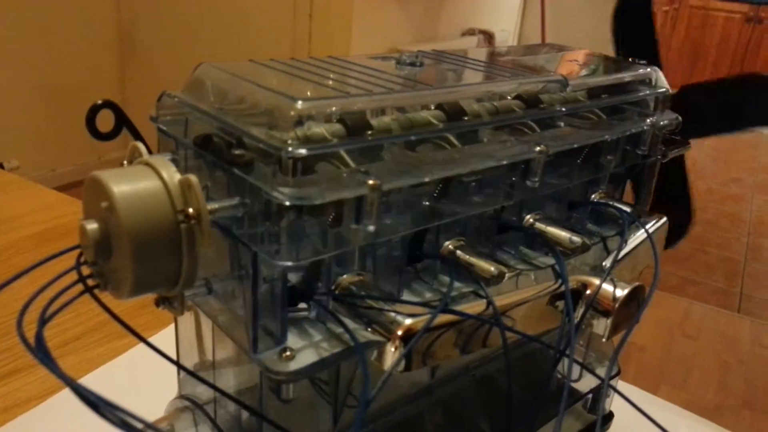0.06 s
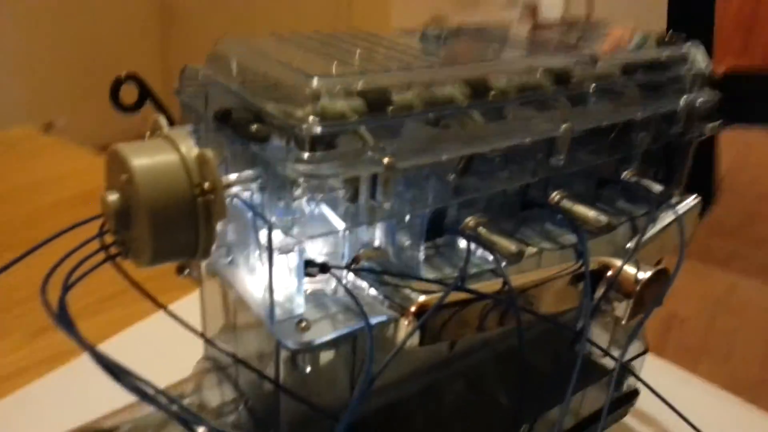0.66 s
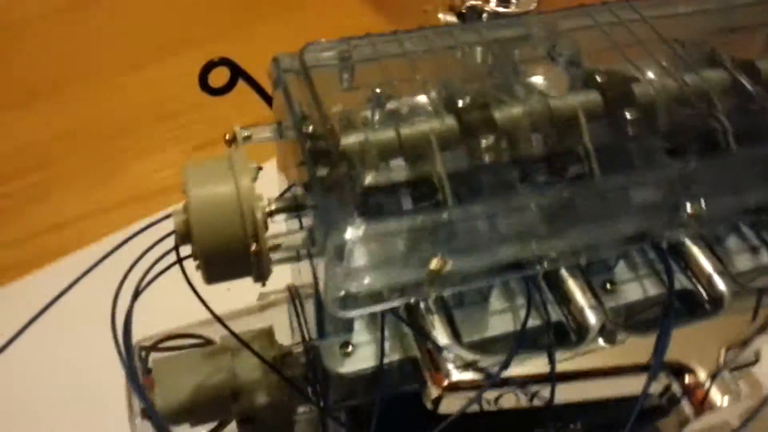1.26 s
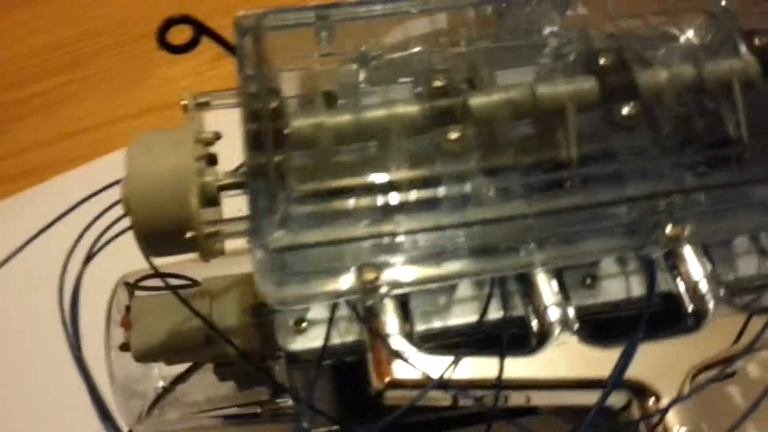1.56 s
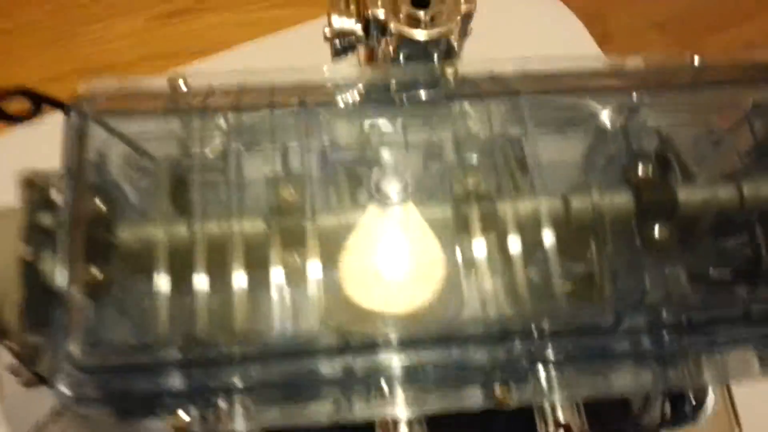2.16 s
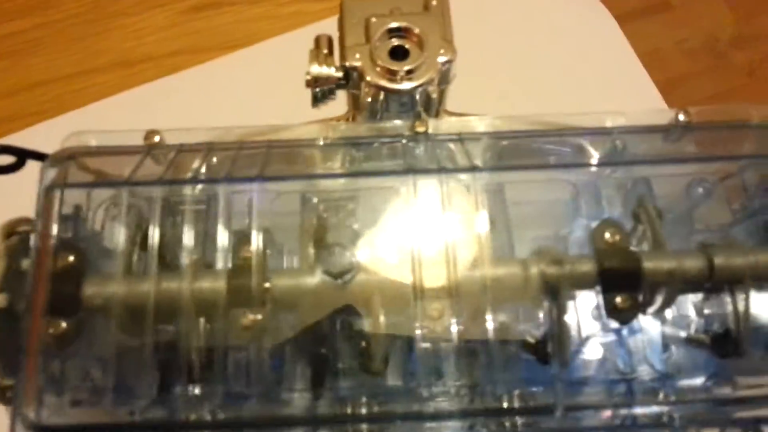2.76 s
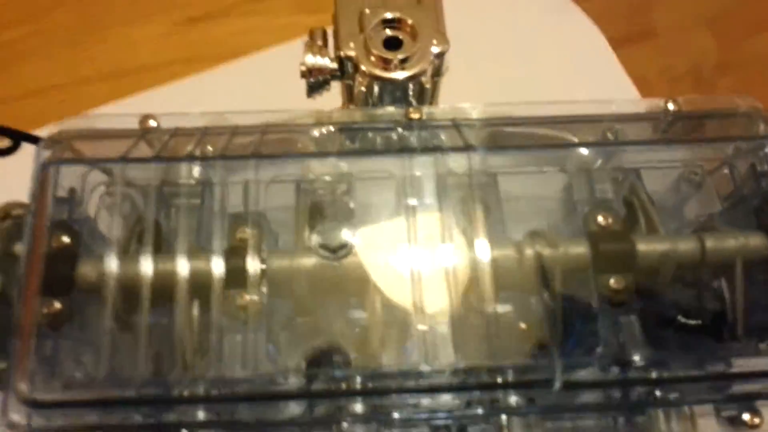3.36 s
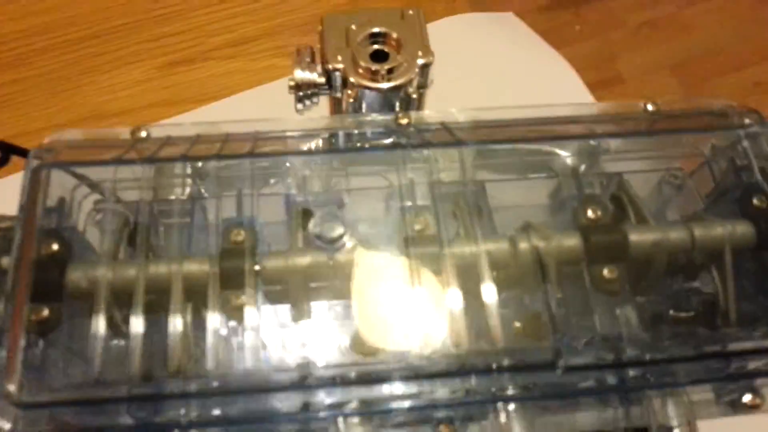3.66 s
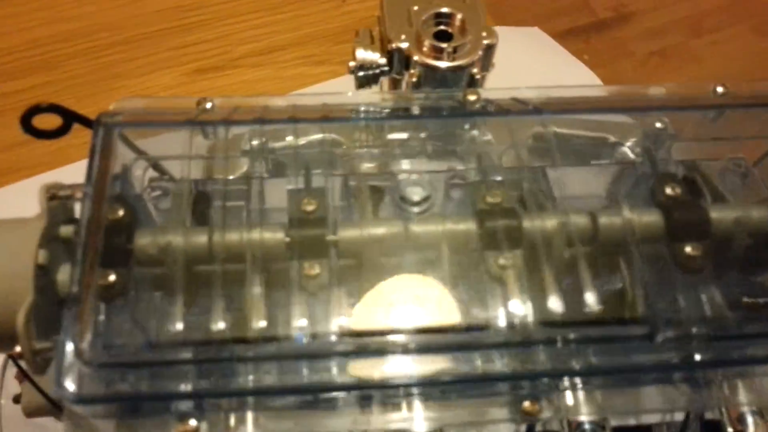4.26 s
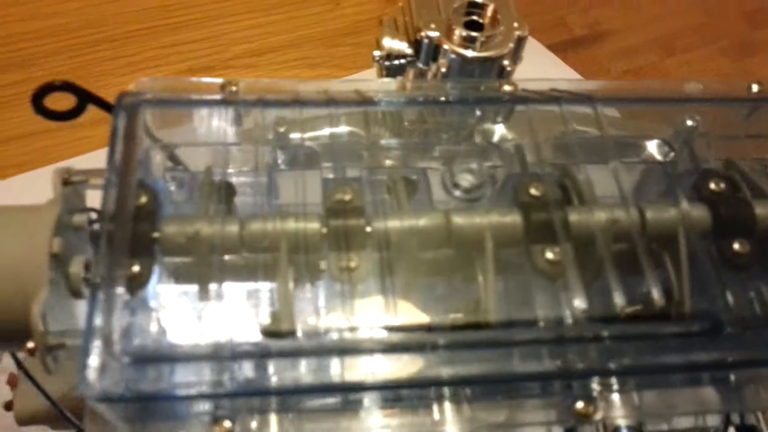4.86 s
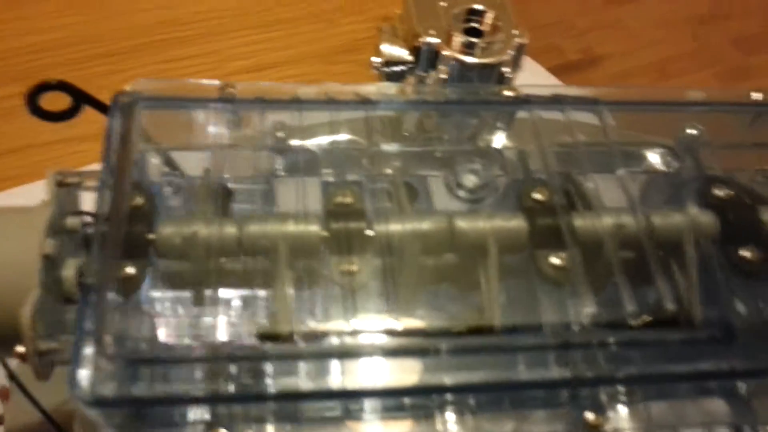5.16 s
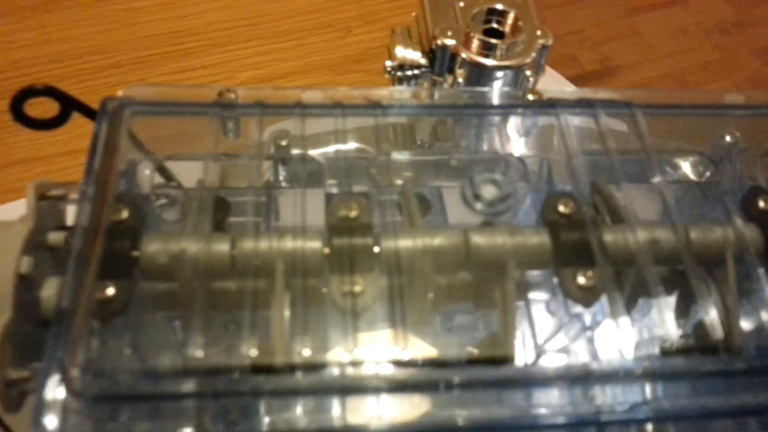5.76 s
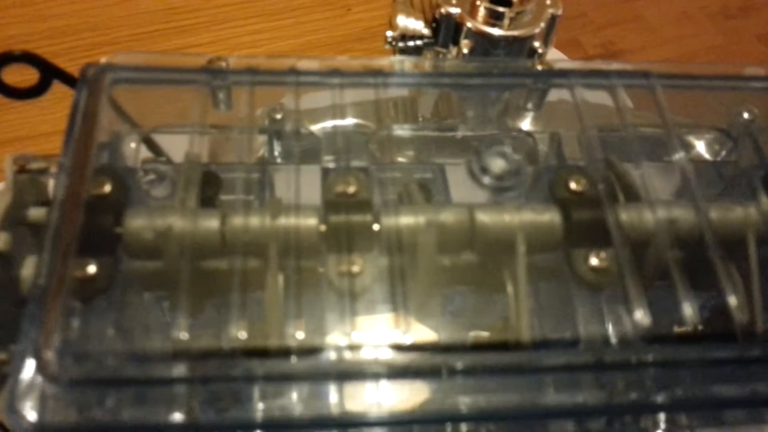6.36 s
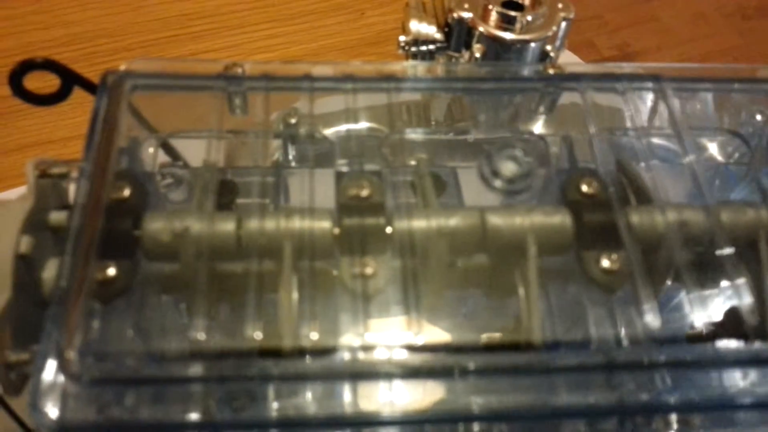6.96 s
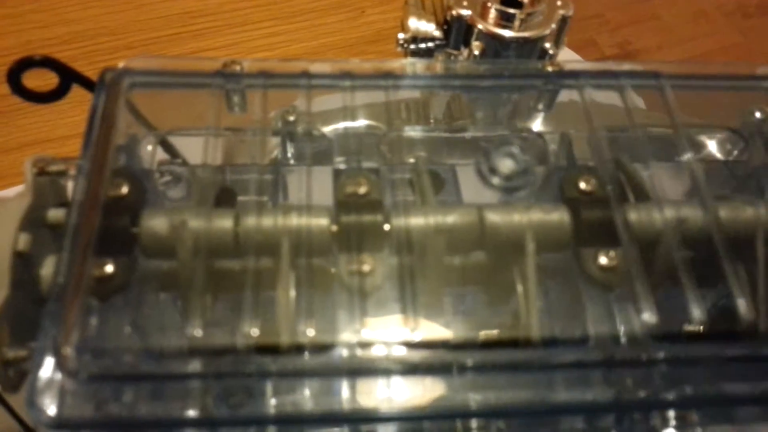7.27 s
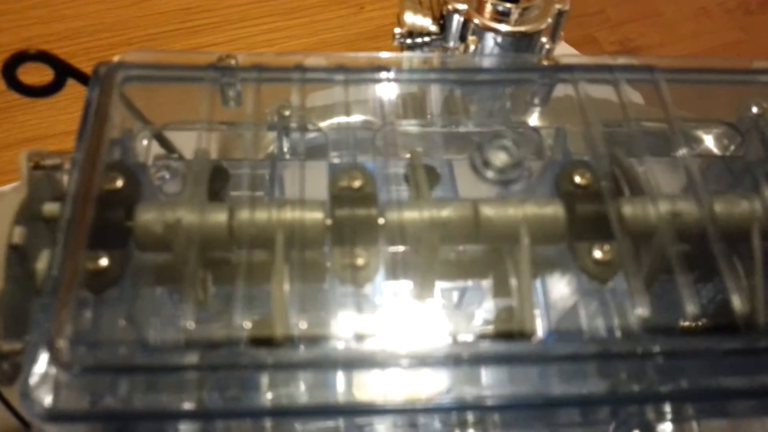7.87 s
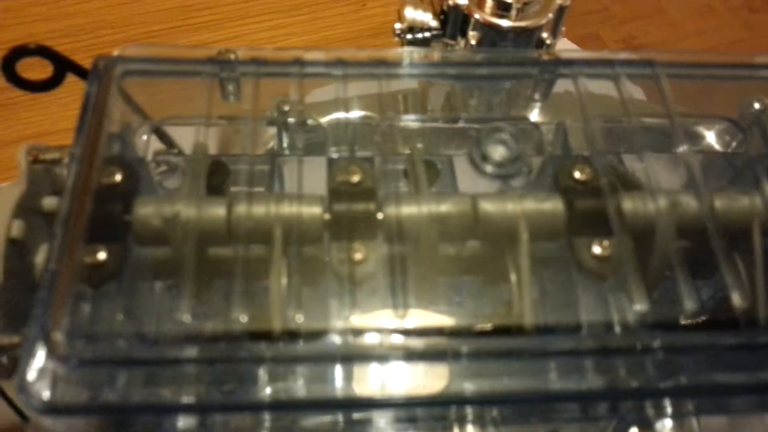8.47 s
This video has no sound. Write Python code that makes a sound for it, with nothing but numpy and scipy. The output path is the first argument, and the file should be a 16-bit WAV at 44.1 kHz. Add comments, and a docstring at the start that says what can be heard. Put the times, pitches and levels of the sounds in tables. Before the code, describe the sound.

A small motor hums as a model engine's plastic gears whine and rattle steadily, with sharp clacks and light clicks.

```python
"""Plastic gears whine, knock and rattle in the hollow case of a model engine running on a table.
A small humming motor drives them; its speed sags and recovers with the load of crank and cams.
About every two seconds a valve part snaps off its cam with a hard clack while the gears ease off.
Lighter clacks, bright ticks of snagging teeth and one soft creak come in between.
The microphone, a hand's width away, moves from the side of the case to above its cover."""
import sys
import numpy as np
from scipy import signal
from scipy.fft import rfft, irfft
from scipy.io import wavfile
from scipy.ndimage import uniform_filter1d, minimum_filter1d

SR = 44100
rng = np.random.default_rng(int(sys.argv[2]) if len(sys.argv) > 2 else 0)


def generate_wav(sig):
    """Save sig (samples, or channels by samples) to the path in sys.argv[1] as 16-bit PCM at SR."""
    pcm = np.round(np.clip(np.atleast_2d(sig).T, -1, 1) * 32767).astype(np.int16)
    wavfile.write(sys.argv[1], SR, pcm)


N = 384111
T = np.arange(N) / SR
PINION, FIRST_WHEEL, SECOND_WHEEL = 10, 30, 36  # teeth; a pinion is the small gear that drives a wheel


def tooth_knocks(turns, flaw=.11, play=.08, twist=.06, runout=.085, scatter_db=1.6, wobble_db=3.2):
    """The second wheel's teeth knock across a small gap; each has its own flaw, and their pinion wobbles."""
    teeth_passed = turns * PINION / FIRST_WHEEL * PINION
    tooth = np.arange(1, int(teeth_passed[-1]) - 1)
    wheel = tooth / SECOND_WHEEL - .03
    flaws = unit(rng.standard_normal(SECOND_WHEEL))[tooth % SECOND_WHEEL]
    time_jitter, level_jitter = rng.standard_normal((len(tooth), 2)).T
    # the teeth crowd together where the wheel runs tight
    early = runout * (np.sin(4 * np.pi * (wheel - .215)) + np.sin(2 * np.pi * (wheel - .69)))
    contact = tooth - early + flaw * flaws + play * time_jitter
    # the plastic shafts twist and spring back, so the tooth rate wavers
    samples = np.interp(contact, teeth_passed + twist * wander(25), np.arange(N)).astype(int)
    force = undb(scatter_db * level_jitter + wobble_db * np.cos(2 * np.pi * tooth / PINION))
    return np.bincount(samples, force * tight_spots(wheel, sharp_db=3.0, broad_db=3.5), N)


def tight_spots(wheel, sharp_db, broad_db):
    """The second wheel does not run true: one sharp catch and one broad rub change the level each turn."""
    return undb(sharp_db * bump(wheel, at=.215, width=.03) + broad_db * bump(wheel, at=.64, width=.095))


# how strongly the hollow case rings at each pitch: f/Hz, level/dB
CASE_TONE = [(100, -102), (170, -23.5), (300, -17), (420, -16.5), (560, -8), (640, -4.5), (720, -1),
             (830, 1), (960, 0.5), (1130, -16.5), (1230, -16.5), (1335, -8.5), (1400, -19.5), (1480, -10.5),
             (1620, -19), (2000, -16), (3000, -57)]

def case_boom(knocks, lag_s=.00009):
    """The knocks ring the case; the boom reaches the left a moment late, and the room scatters a little."""
    boom = unit(colour(knocks - knocks.mean(), CASE_TONE))[0]
    scattered = unit(colour(rng.standard_normal(N), CASE_TONE))
    direct = np.array([undb(-1.37) * np.interp(T - lag_s, T, boom), undb(0.48) * boom])
    return direct + undb(-49) * scattered * np.array([[1], [-1]])


# how hard the gears work: t/s, knock level/dB, rattle level/dB
GEAR_EFFORT = [(0.0, -16.5, -15), (0.2, -24, -18.0), (0.4, -19.5, -17.5), (1.05, -22.5, -18),
               (1.2, -17.5, -19.5), (1.3, -24.5, -22.5), (1.47, -18, -18), (1.6, -20, -18.5),
               (2.12, -16.5, -20), (2.17, -20.5, -21.5), (2.37, -25, -25), (2.42, -19, -22),
               (2.69, -19, -21), (2.94, -21, -18.5), (3.07, -19.5, -22.5), (3.14, -19, -19),
               (3.79, -19.5, -20.5), (3.87, -19, -23), (4.29, -24.5, -24.5), (4.39, -19.5, -21.5),
               (4.64, -20, -21.5), (4.71, -17, -18.5), (4.79, -20.5, -23), (4.91, -19.5, -20.5),
               (5.09, -19.5, -22), (5.41, -17.5, -20), (5.81, -21, -21.5), (5.89, -18.5, -20.5),
               (6.06, -20, -22.5), (6.16, -18.5, -20), (6.51, -17.5, -20), (6.61, -20, -22),
               (6.66, -15, -20), (6.76, -19, -22.5), (6.91, -16.5, -19.5), (7.06, -20.5, -23),
               (7.11, -16.5, -21.5), (7.41, -19, -21.5), (7.51, -18.5, -19.5), (7.61, -22.5, -20.5),
               (7.68, -13.5, -17.5), (7.86, -20.5, -20.5), (7.96, -20.5, -22.5), (8.06, -14, -18.5),
               (8.18, -21.5, -21.5), (8.71, -18, -21.5)]
# when the camshaft passes its catch, once a turn: t/s
CATCH_TIMES = [-.1, 1.891, 3.812, 5.892, 7.788, 9.8]

def gear_load(surge, lull_db=-2.2, knock_surge_db=1.1, rattle_surge_db=.8):
    """Knock and rattle levels in dB follow the slow load, a lull once a cam turn, and quick surges."""
    knock_db, rattle_db = curves(GEAR_EFFORT)
    cam_turns = np.interp(T, CATCH_TIMES, np.arange(len(CATCH_TIMES)))
    lull = lull_db * bump(cam_turns, at=0.005, width=.1)
    return knock_db + lull + knock_surge_db * surge, rattle_db + lull + rattle_surge_db * surge


# how loud the motor's pinion whines: t/s, level/dB
WHINE_LEVEL = [(0, -36), (.3, -28), (.5, -35), (.72, -28), (.87, -31), (1.0, -29), (1.3, -32), (1.47, -28),
               (1.65, -25.5), (1.82, -33), (2.02, -24.5), (2.27, -36), (2.6, -29), (2.87, -36), (3.17, -25),
               (3.35, -32.5), (3.5, -27.5), (3.9, -30), (4.2, -40), (4.4, -29), (4.7, -36), (5.13, -43),
               (5.3, -39), (5.7, -30), (6.0, -33), (6.2, -30.5), (6.4, -32), (6.7, -39), (7.3, -40),
               (7.72, -26.5), (7.85, -30), (8.05, -25.5), (8.3, -34.5), (8.7, -32)]

def gear_whine(turns, wheel, octave_db, wobble=0.15, rough=0.25, rub_db=11, catch_db=6.5):
    """The motor's pinion meshes ten times a turn and rings the case; it chirps at each tight spot."""
    sway = wobble * np.sin(2 * np.pi * turns * PINION / FIRST_WHEEL)
    phase = 2 * np.pi * PINION * turns + sway + rough * wander(120)
    tone = np.array([undb(2.6 * wander(22)) * np.sin(phase + .5 * wander(12)) for _ in range(2)])
    octave = np.array([undb(3.0 * wander(30)) * np.sin(2 * phase + 1.5 * wander(160)) for _ in range(2)])
    chirps = undb(rub_db * bump(wheel, at=.69, width=.15) + catch_db * bump(wheel, at=.23, width=.05))
    return undb(curves(WHINE_LEVEL)[0]) * unit(tone * chirps) + undb(octave_db) * unit(octave)


# tone of the rattle and the hiss: f/Hz, left level/dB, right level/dB
SIDE_TONE = [(228, -40, -33), (680, 4, 5), (1060, -11, -6), (1440, 5, 2), (1630, 3.5, 5.5),
             (1890, 8.5, -15), (2500, 5.5, -4), (2980, 5, -24), (3060, 10.5, 1), (3500, 0.5, -1),
             (3930, 1, -5), (4200, 0.5, -10), (4750, 6, -11), (4860, -33, -7), (6400, -18, -26),
             (9600, -24, -30), (10000, -14, -25), (11300, -19, -17), (13000, -21, -48), (14500, -43, -47)]  # thin walls, from the side
COVER_TONE = [(189, -56, -26.5), (777, 9, 2.5), (1020, 0, -1.5), (1450, 2, 1), (1540, 2.5, 3.5),
              (2080, 6, 4), (2670, -0.5, -7), (3030, -1, 0.5), (3480, -5.5, -2.5), (4140, -0.5, 2),
              (5200, -14.5, -1), (5600, -48, -26), (5760, -38, -11), (6300, -27, -25), (11400, -42, -47)]  # valve cover, from above
HISS_TONE = [(2980, 7.5, -27), (5800, -1, 4), (6640, -5, -1), (6820, 14, 15.5), (8450, 7, 15),
             (9400, 14.5, 11.5), (10300, -25, 13.5), (11300, -36, -91), (14500, -105, -99)]  # sliding teeth and motor brushes

def rattle(wheel, knocks, hiss_db, grain_db=2.5, stir_s=0.0028):
    """Loose parts, stirred by the teeth, chatter through the walls while sliding parts hiss."""
    stir = unit(signal.lfilter([1], [1, -np.exp(-1 / (stir_s * SR))], knocks))
    grain = (1 + .3 * stir) * undb(grain_db * wander(1800))
    chatter = grain * tight_spots(wheel, sharp_db=2.5, broad_db=-2.0)
    from_side = unit(colour(chatter * stereo_noise(shared=0.55, left_delay=-3), SIDE_TONE))
    from_above = unit(colour(chatter * stereo_noise(shared=0.59), COVER_TONE))
    # the microphone's right side comes over the cover first, its left a little later
    above = np.array([np.interp(T, [1.2, 2.4], [0, 1]), np.interp(T, [.9, 1.5], [0, 1])])
    walls = (1 - above) * from_side + above * from_above
    taps = stereo_noise(shared=0.31) * grain * tight_spots(wheel, sharp_db=3.5, broad_db=1.0)
    sliding = stereo_noise(shared=0.13) * undb(1.5 * wander(1500))
    sliding *= tight_spots(wheel + .012, sharp_db=-10.0, broad_db=-2.0)
    hiss = undb(hiss_db - 6.0) * unit(colour(sliding, HISS_TONE))
    return undb(-0.66) * walls + undb(-3.0) * wall_ring(taps) + hiss


# the notes that four parts of the case ring at: f/Hz, width/Hz, level/dB
SIDE_NOTES = [(1100, 60, -20), (1450, 60, -16), (1960, 80, -16), (2370, 60, -19), (3010, 80, -13),
              (3170, 100, -9), (3830, 60, -15), (4130, 80, -19), (4560, 160, -9)]
SHOULDER_NOTES = [(1335, 50, -14), (2350, 70, -17), (2700, 60, -17), (3020, 70, -11), (3230, 60, -10),
                  (3380, 60, -14), (4550, 70, -16), (4950, 130, -9), (5350, 220, -11), (6210, 100, -19)]
COVER_MIDDLE_NOTES = [(1040, 45, -15), (1335, 45, -17), (1900, 80, -13), (2220, 80, -11), (2480, 50, -17),
                      (2750, 60, -15), (2980, 70, -13), (3140, 80, -9), (3300, 60, -13), (4480, 110, -15)]
COVER_END_NOTES = [(1040, 45, -15), (1490, 60, -13), (1950, 80, -14), (2230, 70, -13), (2380, 60, -16),
                   (2680, 60, -17), (3170, 90, -15), (3550, 100, -17), (4260, 80, -16), (4400, 70, -17),
                   (5050, 180, -13), (5280, 110, -17), (6200, 110, -25), (7200, 110, -25)]
# where the microphone is: t/s, place (0 side, 1 shoulder, 2 middle of the cover, 3 its end)
MIC_PATH = [(0, 0), (.75, 0), (1.3, 1), (1.75, 1), (2.3, 2), (3.6, 2), (4.5, 3), (8.7, 3)]

def wall_ring(taps, band_hz=(900, 7500)):
    """Each part of the case rings with its own notes, heard as the microphone passes over it."""
    taps = signal.sosfilt(signal.butter(4, band_hz, "band", fs=SR, output="sos"), taps)
    place, ring = curves(MIC_PATH)[0], 0
    for k, notes in enumerate([SIDE_NOTES, SHOULDER_NOTES, COVER_MIDDLE_NOTES, COVER_END_NOTES]):
        nearness = np.sqrt(np.maximum(1 - np.abs(place - k), 0))
        for hz, width, db in notes:
            note = unit(signal.lfilter(*signal.iirpeak(hz, hz / width, SR), taps))
            ring = ring + nearness * undb(db) * note
    return ring


# each clack: t/s, snap level/dB, thud level/dB, thud f/Hz, ping level/dB, ping f/Hz
CLACK_HITS = [(0.404, -16, -19, 925, -17, 3230), (0.645, -10.5, -20, 940, -19, 3150),
              (0.982, -11.5, -33, 1030, -12, 3890), (1.891, -6, -6, 937, -16, 3170),
              (2.401, -23, -18, 775, -30, 3200), (2.425, -31, -20, 930, -17, 2600),
              (2.667, -29, -12, 724, -35, 3200), (2.759, -16, -11.5, 1010, -30, 3200),
              (3.491, -22, -12, 850, -16, 3223), (3.813, -11, -5, 946, -24, 4200),
              (4.406, -24, -11.5, 815, -17, 3150), (4.551, -21, -16, 840, -17, 2290),
              (4.694, -20, -16, 794, -27, 1900), (4.719, -11.5, -10, 990, -11, 1900),
              (4.84, -19, -13, 797, -28, 2200), (4.889, -25, -11, 810, -28, 4050),
              (5.014, -13.5, -23, 971, -10, 3400), (5.559, -21, -11, 850, -30, 3243),
              (5.892, -8, -9.5, 904, -8, 5250), (5.946, -39, -30, 845, -35, 5256),
              (6.196, -20, -20, 804, -24, 5280), (6.416, -28, -13, 720, -30, 3215),
              (6.66, -21, -16, 830, -22, 3200), (6.73, -14, -8.5, 860, -16.5, 3350),
              (6.91, -26, -22, 820, -30, 5270), (7.435, -25, -15, 850, -30, 3194),
              (7.7882, -9, -3, 944, -14, 4000), (8.02, -25, -15, 830, -19, 2250)]
# tone of the snapping part: f/Hz, level/dB
SNAP_TONE = [(60, -19), (300, -18), (600, 0), (1000, -4), (1650, 1), (2100, 0), (2600, -10), (3000, -3),
             (3250, 6), (3650, -12), (4050, 3), (4350, -5), (4680, 0), (4980, -8), (5280, -1), (5700, -10),
             (6300, -9), (9500, -14), (14500, -33)]
# the notes in the cover's thud: multiple of the thud's pitch, level/dB, fade time/s
THUD_NOTES = [(1, 0, .03), (1.27, 0, .008), (1.6, -5, .004)]

def clacks(snap_s=0.0024, thud_s=.0019, ping_s=.0014, stiffen=0.3, tail_s=0.046, tail_db=-26):
    """A part slips off its cam: it skids with a snap, thuds on the cover and pings the spot it hits."""
    force, ring = np.zeros(N), np.zeros(N)
    age = np.arange(SR // 8) / SR
    # the cover is stiffer while the part presses on it, so the thud starts high and falls
    bent_age = age + stiffen * thud_s * (1 - np.exp(-age / thud_s))
    for start, snap_db, thud_db, thud_hz, ping_db, ping_hz in CLACK_HITS:
        span = slice(int(start * SR), int(start * SR) + len(age))
        force[span] += undb(snap_db) * (blow(age, snap_s) + undb(tail_db) * np.exp(-age / tail_s))
        thud = sum(undb(db) * np.exp(-age / fade_s) * np.sin(2 * np.pi * k * thud_hz * bent_age)
                   for k, db, fade_s in THUD_NOTES)
        ping = np.sin(2 * np.pi * ping_hz * age)
        ring[span] += undb(thud_db) * blow(age, thud_s) * thud + undb(ping_db) * blow(age, ping_s) * ping
    snaps = colour(force * stereo_noise(shared=0.065), SNAP_TONE)
    return soften(snaps) + ring


def soften(snaps, hard_db=-12, soft_db=-22, soft_hz=7000):
    """A lighter contact is duller: weak snaps lose their treble."""
    hardness = np.clip((curves(CLACK_HITS)[0] - soft_db) / (hard_db - soft_db), 0, 1)
    dull = signal.sosfiltfilt(signal.butter(2, soft_hz, fs=SR, output="sos"), snaps)
    return dull + hardness * (snaps - dull)


# when the second wheel snags hard: t/s, level/dB
SNAG_HITS = [(0.83, -21), (4.987, -12), (5.187, -10), (5.239, -9), (5.285, -8), (5.436, -12), (6.346, -19),
             (6.492, -14), (6.543, -22), (6.640, -12), (6.689, -14), (6.787, -11), (6.835, -15),
             (6.935, -12.5), (6.985, -12), (7.085, -11), (7.136, -16), (7.284, -15)]
# tone of the snagging tooth: f/Hz, level/dB
SNAG_TONE = [(400, -11), (1500, 0), (2400, -3), (3500, 0), (4400, 13), (5200, 7), (6000, -17), (7000, -20),
             (11000, -12), (14000, -54)]

def snags(rise_s=0.00073):
    """A tooth snags and lets go with a short, bright tick."""
    force, age = np.zeros(N), np.arange(SR // 50) / SR
    for start, db in SNAG_HITS:
        force[int(start * SR):int(start * SR) + len(age)] += undb(db) * blow(age, rise_s)
    return undb(-4.0) * colour(force * stereo_noise(shared=0.19), SNAG_TONE)


# how loud the motor hums: t/s, level/dB
HUM_LEVEL = [(0.0, -42.5), (0.56, -35.5), (1.11, -48.5), (2.11, -44), (2.25, -50), (2.57, -43), (3.08, -51),
             (3.42, -44.5), (4.34, -48), (4.56, -39.5), (5.17, -45), (5.75, -42), (6.04, -49), (6.18, -43),
             (6.89, -41), (7.03, -46), (7.62, -45), (7.69, -40), (7.93, -46), (8.05, -40), (8.3, -46),
             (8.71, -43)]
# the notes that the case's panels ring at: f/Hz, width/Hz, level/dB
PANEL_NOTES = [(450, 170, -32.5), (683.6, 130, -8), (751, 87, 0), (1466, 140, -18.5)]

def motor_hum(shaft_hz, turns, overtone_db):
    """The unbalanced motor hums at shaft speed; each overtone swells as it glides past a panel's note."""
    overtones = 0
    for k in range(2, 8):
        swell = np.max([undb(db) / (1 + (2 * (k * shaft_hz - hz) / width) ** 2)
                        for hz, width, db in PANEL_NOTES], axis=0)
        overtones += swell * undb(1.5 * wander(25)) * np.sin(2 * np.pi * k * turns + 0.37 * wander(30))
    hum = undb(curves(HUM_LEVEL)[0] + 1.3 * wander(23)) * np.sin(2 * np.pi * turns)
    lean_left = undb([[.7], [-.7]])
    return np.sqrt(2) * (hum * lean_left + undb(overtone_db) * overtones)


# the wall's creak: t/s, f/Hz, level/dB
CREAK_GLIDE = [(1.19, 331, -72), (1.215, 307.3, -35), (1.245, 257, -34), (1.265, 265, -53),
               (1.28, 280, -31), (1.31, 290, -78)]

def creak():
    """The wall creaks once with a soft, low, gliding tone."""
    hz, db = curves(CREAK_GLIDE)
    sounding = (db > db[0]) & (T < CREAK_GLIDE[-1][0])
    return undb(db) * sounding * np.sin(2 * np.pi * np.cumsum(hz) / SR)


def undb(db):
    """Turn decibels into a gain."""
    return 10 ** (np.asarray(db) / 20)


def unit(x):
    """Scale a signal to an average power of 1."""
    return x / np.sqrt(np.mean(x ** 2))


def curves(table):
    """Join each column of a table with straight lines over time."""
    times, *columns = np.transpose(table)
    return [np.interp(T, times, c) for c in columns]


def colour(x, table, size=2048):
    """Filter a sound with a tone table; a second level column gives a second channel."""
    hz, *columns = np.transpose(table)
    log_hz = np.log(np.maximum(np.fft.rfftfreq(size, 1 / SR), 1))
    cepstrum = irfft([np.log(undb(np.interp(log_hz, np.log(hz), c))) for c in columns])
    # fold it so that the ringing comes after a hit, never before
    cepstrum[:, 1:size // 2] *= 2
    cepstrum[:, size // 2 + 1:] = 0
    response = irfft(np.exp(rfft(cepstrum)))
    response /= np.sqrt(np.sum(response ** 2) / len(columns))
    return signal.fftconvolve(np.atleast_2d(x), response, axes=1)[:, :N]


def wander(per_second):
    """A smooth random wiggle with a typical size of 1."""
    step = max(int(SR / per_second), 1)
    stairs = np.repeat(rng.standard_normal(N // step + 1), step)
    return unit(uniform_filter1d(stairs, step)[:N])


def stereo_noise(shared, left_delay=15):
    """Noise with a part both sides share (left_delay samples late on the left) and a scattered part."""
    direct, scattered = rng.standard_normal(N), rng.standard_normal((2, N))
    both_sides = np.array([np.roll(direct, left_delay), direct])
    return np.sqrt(shared) * both_sides + np.sqrt(1 - shared) * scattered


def bump(turns, at, width):
    """A smooth rise and fall once a turn; its place and width are in turns."""
    return np.exp(-.5 * (((turns - at + .5) % 1 - .5) / width) ** 2)


def blow(age, rise_s):
    """A contact that swells to 1 and dies away."""
    return age / rise_s * np.exp(1 - age / rise_s)


def limiter(x, limit_db=2.5, attack_s=.004, hold_s=0.071, release_s=0.19):
    """A peak over the limit turns the volume down; it holds a moment, then recovers."""
    wanted_db = np.minimum(0, limit_db - 20 * np.log10(np.abs(x).max(axis=0) + 1e-9))
    half = int(hold_s * SR / 2)
    held_db = minimum_filter1d(wanted_db, 2 * half + 1, origin=half)
    fast, slow = (signal.lfilter([1 / (s * SR)], [1, 1 / (s * SR) - 1], held_db)
                  for s in (attack_s, release_s))
    return x * undb(np.minimum(fast, slow))


# how many turns the motor makes each second: t/s, f/Hz
MOTOR_SPEED = [(0.0, 213.94), (0.4, 221.71), (0.6, 220.83), (1.0, 200.26), (1.6, 200.43), (2.0, 210.32),
               (2.1, 211.72), (2.3, 217.85), (2.6, 223.69), (3.0, 208.84), (3.2, 206.99), (3.4, 211.84),
               (3.7, 207.24), (4.0, 212.63), (4.2, 212.76), (4.6, 226.35), (5.2, 214.31), (5.4, 216.5),
               (5.5, 211.93), (5.7, 209.76), (6.0, 215.53), (6.1, 214.89), (6.4, 220.14), (6.6, 221.03),
               (6.9, 218.88), (7.0, 216.17), (7.4, 215.77), (7.5, 211.48), (7.7, 208.54), (8.0, 213.45),
               (8.2, 212.7), (8.7, 219.2)]
# the treble as the microphone moves: t/s, hiss level/dB, level of the whine's octave/dB
TREBLE_LEVELS = [(0, -12.5, -33), (1.2, -13, -32), (1.6, -16, -29), (2.5, -15.5, -44), (3.4, -17.5, -35.5),
                 (4.7, -16.5, -39.5), (5.3, -15, -31), (6.0, -15, -39), (7.1, -15.5, -32.5),
                 (7.9, -16.5, -43), (8.7, -15, -36)]

def scene(surge_lag_turns=.012):
    """One shaft drives every gear; each surge of load makes them louder and holds the shaft back a bit."""
    surge = wander(per_second=24)  # uneven drag of the pistons
    shaft_hz = curves(MOTOR_SPEED)[0]
    turns = np.cumsum(shaft_hz) / SR - surge_lag_turns * surge
    wheel = turns * PINION / FIRST_WHEEL * PINION / SECOND_WHEEL  # turns of the second wheel
    hiss_db, octave_db = curves(TREBLE_LEVELS)
    knock_db, rattle_db = gear_load(surge)
    knocks = tooth_knocks(turns)
    gears = undb(knock_db - 2.5) * case_boom(knocks) + gear_whine(turns, wheel, octave_db)
    motor = motor_hum(shaft_hz, turns, overtone_db=knock_db)
    loose_parts = undb(rattle_db) * rattle(wheel, knocks, hiss_db)
    return gears + motor + loose_parts + snags() + clacks() + creak()


def record(dry, bass_hz=140, top_hz=15200):
    """The phone cuts the bass, dips after the hardest clacks, clips them and cuts the highest treble."""
    thin = signal.sosfilt(signal.butter(4, bass_hz, "high", fs=SR, output="sos"), dry)
    clipped = np.clip(limiter(thin), -1, 1)
    return signal.sosfilt(signal.ellip(8, .2, 70, top_hz, fs=SR, output="sos"), clipped)


dry = scene()
out = record(dry)
generate_wav(out)
```